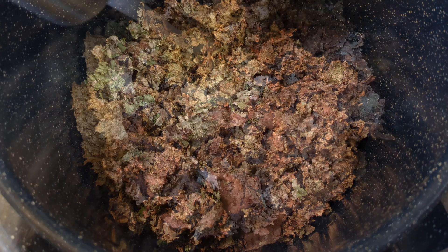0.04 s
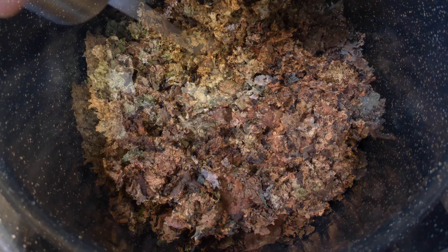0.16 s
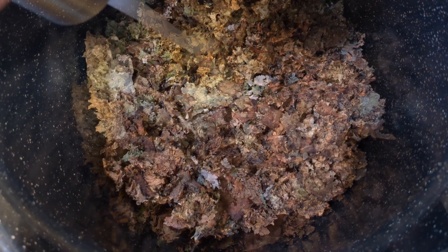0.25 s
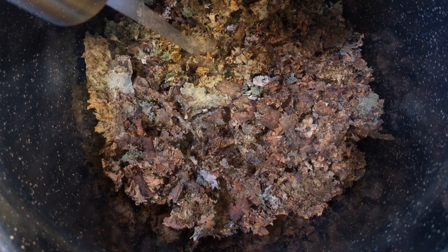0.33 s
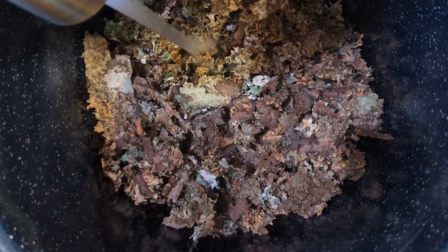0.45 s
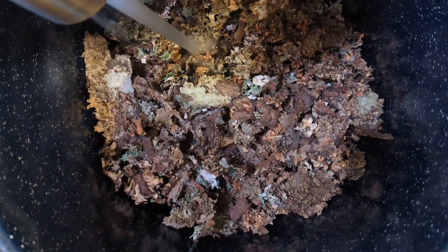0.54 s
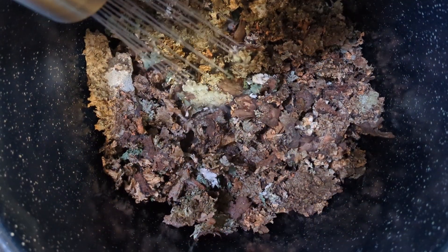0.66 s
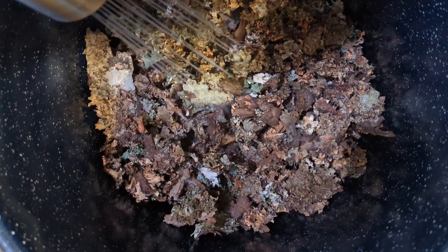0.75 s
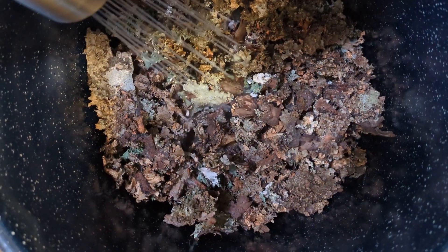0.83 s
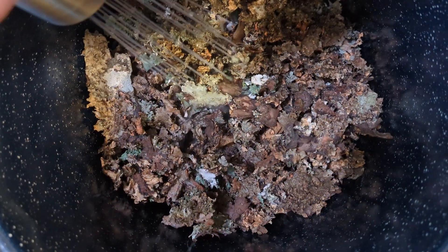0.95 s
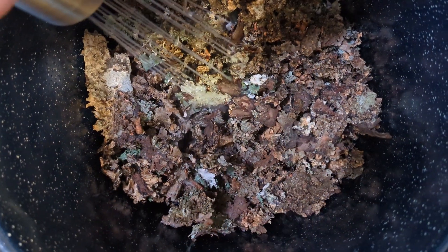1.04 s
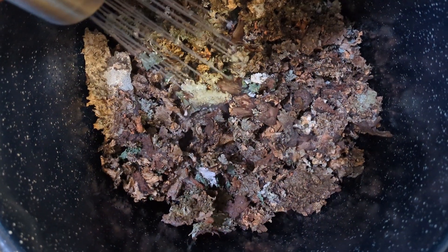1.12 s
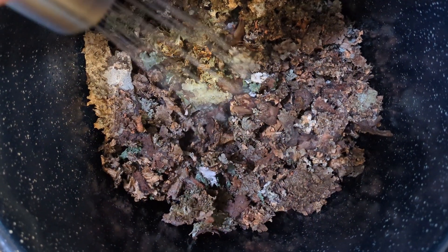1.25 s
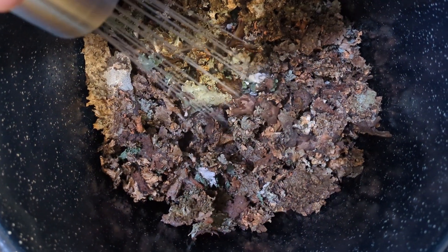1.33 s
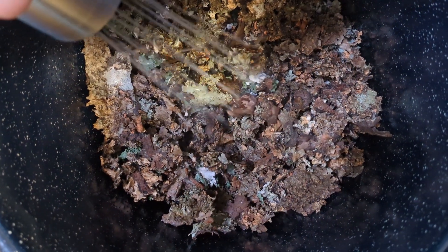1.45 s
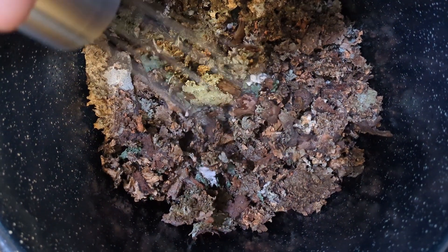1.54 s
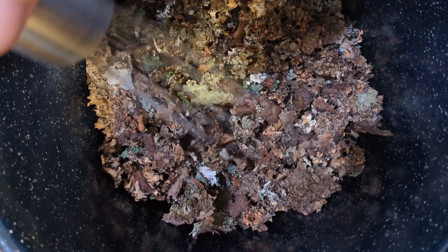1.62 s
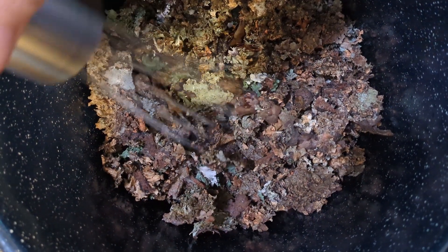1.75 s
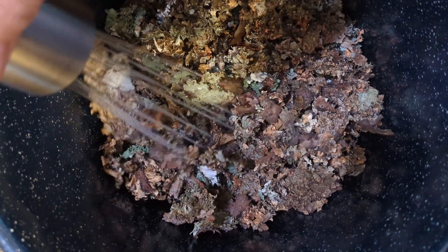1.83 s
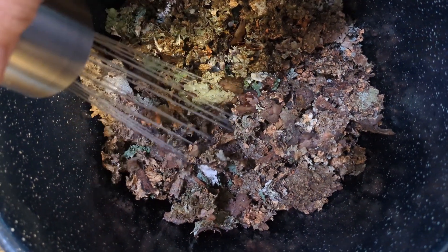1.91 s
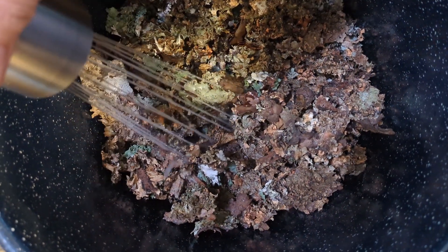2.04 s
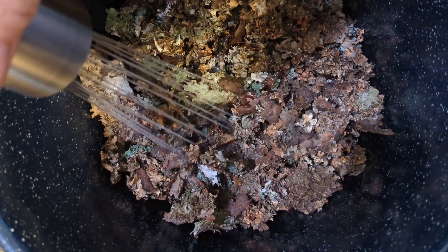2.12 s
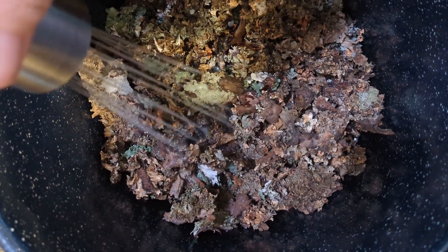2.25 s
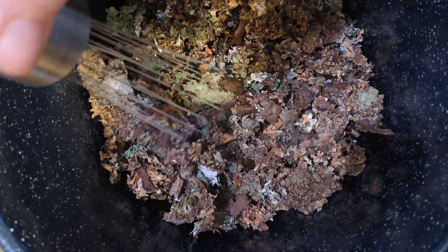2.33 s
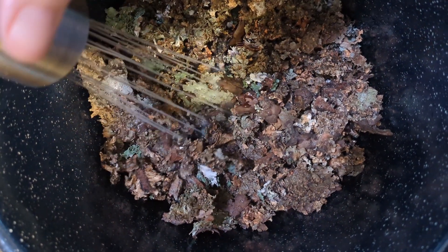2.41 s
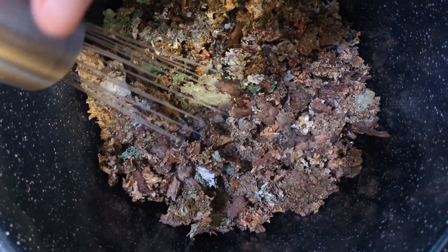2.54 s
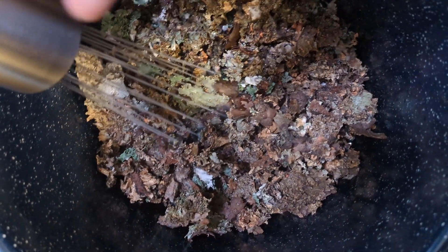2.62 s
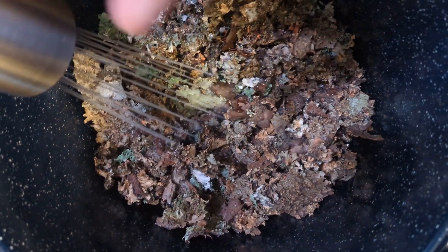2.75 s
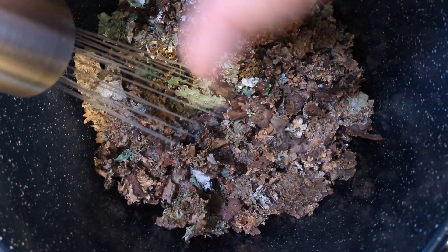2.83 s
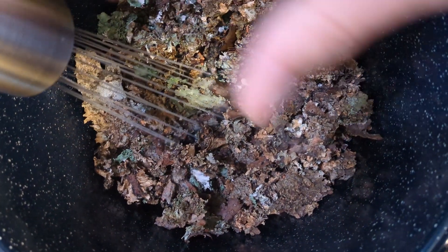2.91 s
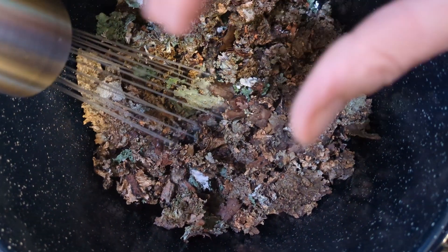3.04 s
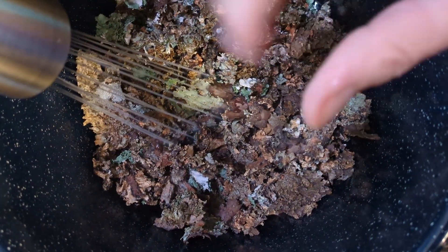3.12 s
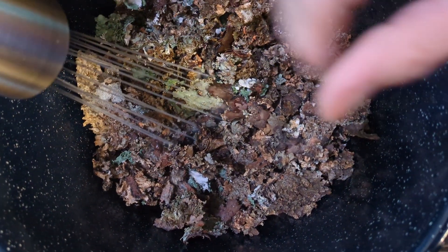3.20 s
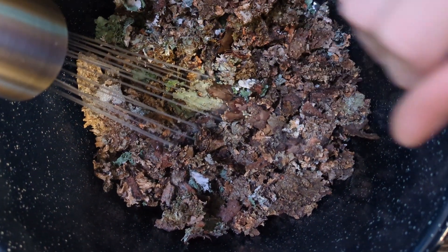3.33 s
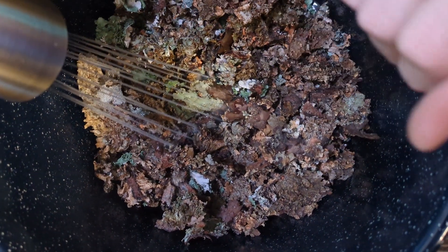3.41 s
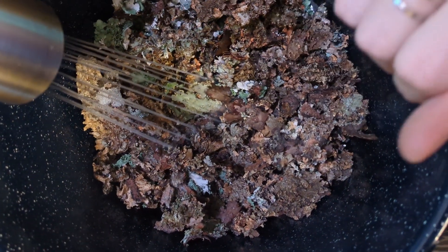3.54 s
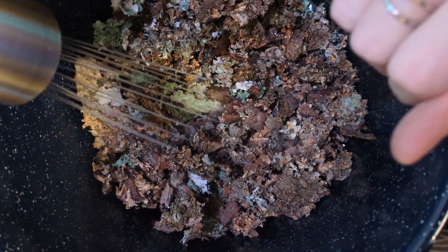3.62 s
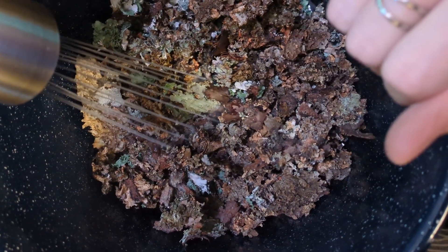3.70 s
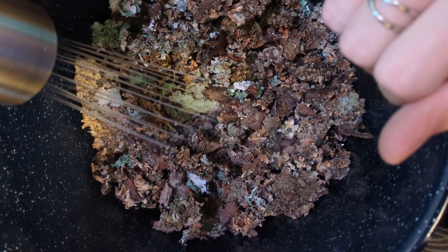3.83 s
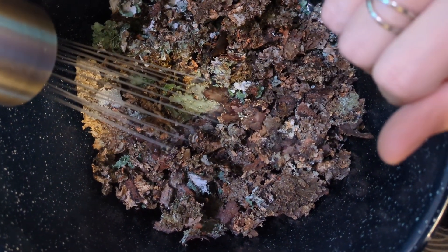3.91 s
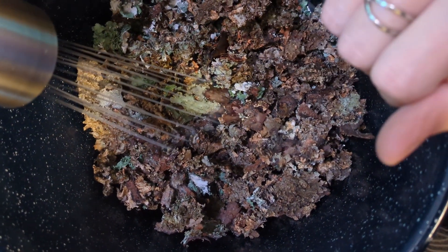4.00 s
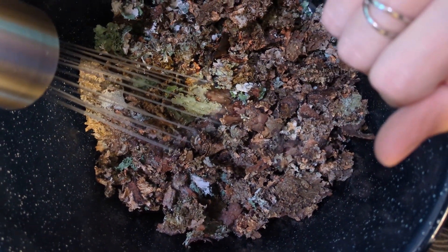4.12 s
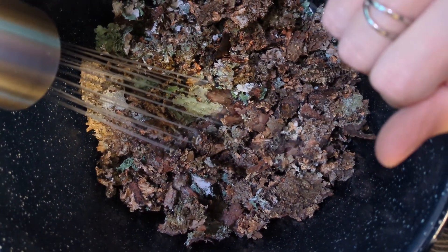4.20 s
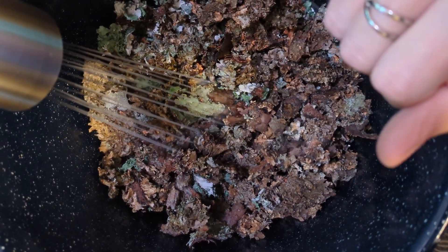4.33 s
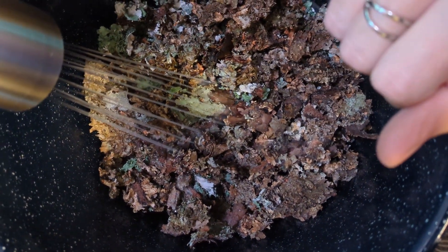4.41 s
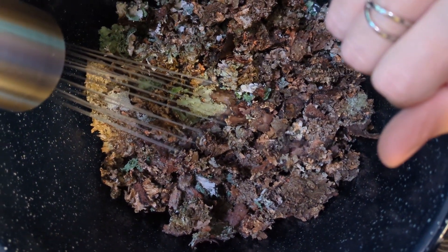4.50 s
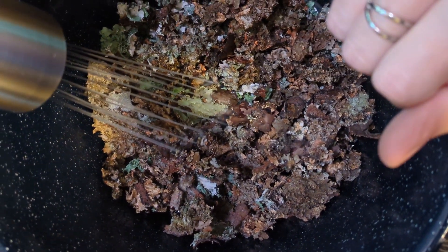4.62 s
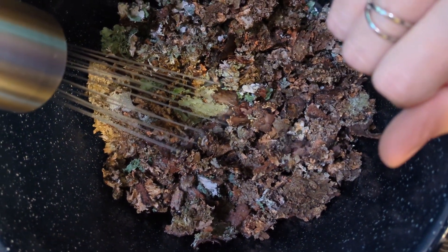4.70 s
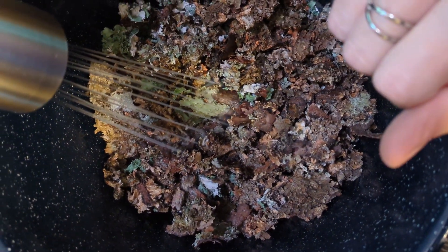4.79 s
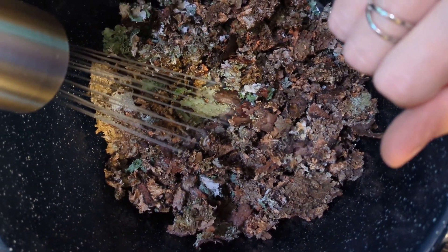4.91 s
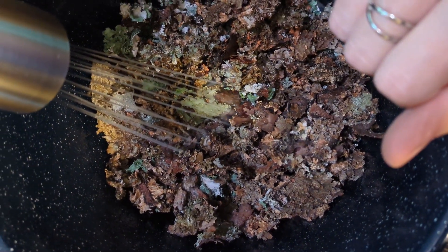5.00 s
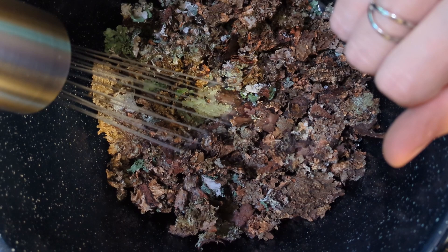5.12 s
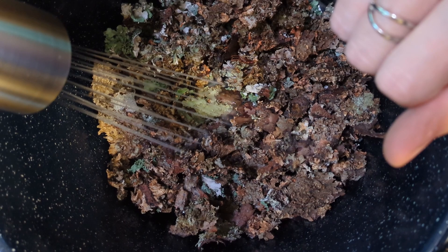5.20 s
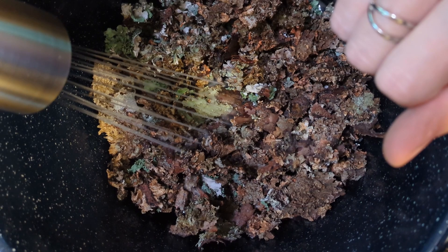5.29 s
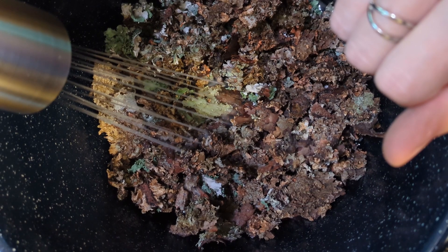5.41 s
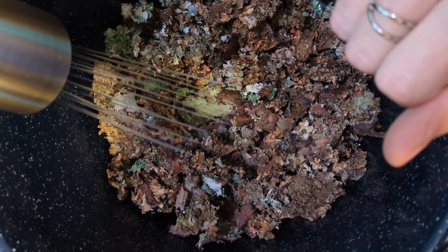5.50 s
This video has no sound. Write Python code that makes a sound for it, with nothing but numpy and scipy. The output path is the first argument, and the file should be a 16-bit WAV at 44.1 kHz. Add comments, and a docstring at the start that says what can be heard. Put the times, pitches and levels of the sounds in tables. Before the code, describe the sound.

A thin water stream fizzes briefly, then a valve clunks over and a bright, steady spray hisses onto flaky material in a pot.

```python
"""A spray of thin jets patters on lichen and bark in an enamel pot: random drops, echoed and coloured.
Before it, a soft single tap stream fizzes; a valve called the diverter snaps over with a sinking gulp.
The drops ring the pot (resonances), jets spit and sizzle (noise bursts), and water burbles (low noise).
The sprayer is moved about and bumped by hand (dull thuds). Behind it all an appliance motor hums
(sine tones) over a faint rumble (filtered noise)."""
import sys
import numpy as np
from scipy import signal
from scipy.fft import rfft, irfft, next_fast_len
from scipy.io import wavfile

SR = 44100
rng = np.random.default_rng(int(sys.argv[2]) if len(sys.argv) > 2 else 0)


def store_wav(level_fs):
    """Save 16-bit WAV to argv[1]."""
    pcm = np.round(np.clip(np.atleast_2d(level_fs), -1, 1) * 32767)
    wavfile.write(sys.argv[1], SR, pcm.T.astype(np.int16))


N = 244774
TIME = np.arange(N) / SR
FFT_SIZE = next_fast_len(N + SR // 10, True)  # spare room for filter tails
FREQS = np.maximum(np.arange(FFT_SIZE // 2 + 1) * SR / FFT_SIZE, 1)

# Tone colours, as strength at each frequency: pitch_hz, level_db (per Hz)
ROOM_COLOUR = [(20, -16), (45, -6), (100, 1.5), (140, -5), (180, -14.5), (280, -7.5), (500, -17.5),
               (1000, -29), (4000, -41), (9000, -48), (15000, -62)]
POOL_COLOUR = [(150, -28), (220, -10), (295, 7.5), (325, -1), (370, 0.5), (450, -8), (650, -32),
               (1200, -50)]
STREAM_COLOUR = [(400, -18.5), (620, -26), (950, -13), (1400, -13.5), (2300, -7), (3400, -10.5),
                 (5400, -10), (6300, -5.5), (8300, -3.5), (10800, -2), (11500, -6.5), (13400, -7.5),
                 (13900, -13), (15800, -12)]
SPRAY_COLOUR = [(400, -27), (620, -23), (950, -10.5), (1400, -10), (2100, -9), (2800, -0.5), (3700, -2),
                (4300, -4.5), (5100, -4.5), (5900, -4), (7700, -1.5), (11200, -1.5), (12300, -3.5),
                (13500, -4), (14050, -9), (15800, -9.5)]
# Steady tones of the motor hum: pitch_hz, rms_db
HUM = [(58.8, -41.5), (120, -54.5), (206, -75), (237, -66.5), (299.5, -68)]
# The hand bumps the sprayer: middle_s, level_db, spread_s, pitch_hz
BUMPS = [(2.862, -47, 0.014, 160), (2.89, -46.5, 0.029, 120)]
# The diverter flips with a gulp: start_s, level_db, start_hz, end_hz, rise_s, t60_s (time to fall 60 dB)
GULP = [(0.628, -35.5, 325, 265, 0.016, 0.47), (0.626, -37.5, 880, 1000, 0.0023, 0.17)]
# The diverter snaps over: middle_s, level_db, pitch_hz
SNAPS = [(0.63, -41, 1600), (0.641, -30.5, 3000)]
# Narrow resonances of the falling stream: pitch_hz, width_hz, boost_db
STREAM_PEAKS = [(3800, 210, 8), (4680, 140, 8), (6430, 300, 4), (8720, 180, 4.5), (9200, 350, 3.5),
                (10400, 250, -1.5), (10700, 200, 8), (12650, 360, 4), (13500, 150, 3)]
# How much later each spot's drops reach the right microphone than the left: lag_samples
JET_LAGS = [11, 4, 10, 7, 11, 3, 13, 10]
# A jet catches an edge and spits: middle_s, level_db, pitch_hz
SPITS = [(1.083, -29.5, 9500), (1.318, -31.5, 9000), (1.345, -33, 8500), (1.677, -31, 6200),
         (1.77, -31, 10500), (1.832, -31, 11200), (1.862, -33, 11500), (1.963, -33, 9900), (2.4, -37, 5700)]
# A jet dwells in a wet hollow and sizzles: middle_s, level_db, spread_s, pitch_hz
SIZZLES = [(1.41, -41, .035, 4000), (2.6, -40, 0.12, 8350), (2.876, -41, 0.12, 5080),
           (3.03, -35, 0.068, 7850), (3.84, -35, .08, 11700), (3.95, -43, 0.52, 3640)]
# Ringing tones of the pot wall: pitch_hz, width_hz, level_db, left_minus_right_db
POT_MODES = [(1006, 49, -21, 9), (1227, 47, -16.5, -10), (1449, 18, -20.5, 22), (1703, 47, -11, 12.5),
             (1790, 78, -11, 20.5), (1848, 32, -8, 15), (2097, 61, -10, 3), (2350, 13, -13.5, -6)]
# A jet grazes the pot wall: middle_s, boost_db
GRAZES = [(1.63, 5), (1.82, 5.5), (4.67, 4), (5.43, 6.5)]
# Standing water that the jets meet; only the swing around the mean counts: time_s, level_db
SOAK = [(0.76, -38.5), (1.24, -40), (1.25, -41.5), (1.37, -37), (1.38, -33.5), (1.51, -38), (1.9, -40),
        (1.91, -36.5), (1.99, -41), (2.36, -41), (2.4, -37.5), (3.72, -36), (5.4, -36.5)]
# Where the sprayer points: time_s, left_minus_right_db
AIM = [(0.65, 2.5), (1.01, 3.5), (2.38, 1), (3.97, 3.0), (5.28, 3), (5.5, 4.5)]
# How the microphone pair hears each pitch: pitch_hz, left_minus_right_db
BALANCE = [(400, -9.5), (750, -3.5), (1000, -0.3), (1250, -0.8), (1800, 4), (2700, -0.5), (4400, -2.5),
           (8000, -1.1), (14000, 3)]

STREAM_START_S = 0.1147  # the stream is heard abruptly, already running
SPRAY_ON_S, SPRAY_RISE_S = 0.626, 0.0076
ROOM_DB, STREAM_DB = -54.5, -35.2
CUTOFF_HZ = 15780
# Base level of each layer, and the share of the soak's swing that it follows
HISS_DB = -30.5
SPLASH_DB, SPLASH_FOLLOWS = -41.5, 1.4
PATTER_DB, PATTER_FOLLOWS = -45.5, 0.56
WALL_DB, WALL_FOLLOWS = -46, 1.2
POOL_DB, POOL_FOLLOWS = -56.5, 0.55
# As the pot fills, wall and pool get louder: total rise from empty to filled
FILL_START_S, FILL_S, WALL_FILL_DB, POOL_FILL_DB = 1.2, 1.8, 4, 3
# The jets form just after the switch and overshoot while the pent-up pressure escapes
JETS_DELAY_S, JETS_RISE_S = 0.026, 0.027
SURGE_DB, SURGE_HOLD_S, SURGE_DECAY_S = 3, 0.096, 0.028
DRY_DB, WETTING_S = 0.5, 1.1  # dry flakes hiss louder until they are wetted
# While the sprayer is turned, the jets glance off the heap and hiss less
TURN_S, TURN_SPREAD_S, TURN_DB = 1.86, 0.28, -0.7
# Spread of each short event in time; filter width as a share of its pitch
SPIT_S, SPIT_WIDTH = 0.012, 0.45
SNAP_S, SNAP_WIDTH = 0.002, 0.91
SIZZLE_WIDTH, GRAZE_S = 0.11, 0.073


def from_db(db):
    """Turn decibels into a multiplier."""
    return 10 ** (np.asarray(db) / 20)


def rms_one(x):
    """Scale so that the average of all channels has an rms of 1."""
    return x / np.sqrt(np.mean(np.atleast_2d(x).mean(axis=0) ** 2) + 1e-20)


def in_time(rows):
    """Draw a curve over time for each table column after the first."""
    s, *columns = np.transpose(rows)
    return [np.interp(TIME, s, column) for column in columns]


def per_hz(points):
    """Read a two-column pitch table at every frequency."""
    hz, db = np.transpose(points)
    return np.interp(np.log(FREQS), np.log(hz), db)


def shaped(x, gain):
    """Multiply each frequency of a sound by its own gain."""
    return irfft(rfft(x, FFT_SIZE) * gain, FFT_SIZE)[..., :N]


def panned(db):
    """Left and right gains for a left-minus-right difference in dB."""
    return from_db(np.array([[0.5], [-0.5]]) * db)


def ramp(at_s, rise_s):
    """A straight ramp from 0 to 1."""
    return np.clip((TIME - at_s) / rise_s, 0, 1)


def bell(s, spread_s):
    """A smooth rise and fall around a moment, 1 on top."""
    return np.exp(-0.5 * ((TIME - s) / spread_s) ** 2)


def drift(rate_hz):
    """Slow random wandering with an rms of 1."""
    return rms_one(shaped(rng.standard_normal(N), 1 / (1 + (FREQS / rate_hz) ** 2)))


def resonance(x, hz, width_hz):
    """Ring at one pitch, with a gain of about 1 at the peak."""
    r = np.exp(-np.pi * width_hz / SR)
    top = np.array([1, 0, -1]) * (1 - r * r) / 2
    bottom = [1, -2 * r * np.cos(2 * np.pi * hz / SR), r * r]
    return signal.lfilter(top, bottom, x)


def swell(noise, s, db, spread_s, hz, width_hz):
    """Noise passed twice through one resonance, rising and falling around a moment."""
    colour = resonance(resonance(noise, hz, width_hz), hz, width_hz)
    return rms_one(colour) * from_db(db) * bell(s, spread_s)


def mid_and_side(mid, side, side_db):
    """Add a difference between left and right to a shared middle."""
    return mid + from_db(side_db) * side * [[1], [-1]]


def drops(per_s, spread_db):
    """Impacts at random moments, many small and a few large."""
    sizes = from_db(spread_db * np.minimum(rng.exponential(1, N), 5))
    hits = rng.random(N) < per_s / SR
    return hits * sizes * rng.choice([-1, 1], N)


def jets(per_s, spread_db, echo_db, echo_t60, diffuse_hz, count):
    """Each jet's drops reach the left microphone first, then rattle between the pot walls."""
    t = np.arange(SR // 40) / SR
    high_pass = signal.butter(2, diffuse_hz, "high", fs=SR)
    out = np.zeros((2, N))
    for lag in np.resize(JET_LAGS, count):
        echoes = rng.standard_normal((2, len(t))) * from_db(-60 * t / echo_t60)
        echoes *= from_db(echo_db) / np.sqrt(np.sum(echoes ** 2) / 2)
        # long waves stay alike on both sides; short ones scatter
        path = signal.lfilter(*high_pass, echoes)
        path[0, 0] += 1
        path[1, lag] += 1
        out += signal.oaconvolve(drops(per_s / count, spread_db)[None], path, axes=1)[:, :N]
    # even out the extra treble that the echoes bring
    scattered = from_db(2 * echo_db) / (1 + (diffuse_hz / FREQS) ** 4)
    return shaped(out, 1 / np.sqrt(1 + scattered))


def soak():
    """How far the standing water is above or below its mean during the spray, in dB."""
    db, = in_time(SOAK)
    return db - db[TIME > SPRAY_ON_S].mean()


def filling():
    """Water gathers in the pot: -0.5 when empty, 0.5 when filled."""
    return ramp(FILL_START_S, FILL_S) - 0.5


def kitchen(side_db=-10):
    """An appliance motor hums in steady sine tones over a faint noise rumble."""
    hum = np.zeros(N)
    for hz, db in HUM:
        # a sine's peak is the square root of 2 times its rms
        hum += np.sqrt(2) * from_db(db) * np.sin(2 * np.pi * (hz * TIME + rng.random()))
    mid, side = rng.standard_normal((2, N))
    rumble = rms_one(shaped(mid_and_side(mid, side, side_db), from_db(per_hz(ROOM_COLOUR))))
    return (hum + from_db(ROOM_DB) * rumble) * panned(0.6)


def bumps(width_hz=85, side_db=-3):
    """Dull thuds of handling: low noise bursts, different on each side."""
    mid, side = rng.standard_normal((2, N))
    noise = mid_and_side(mid, side, side_db)
    return sum(swell(noise, *row, width_hz) for row in BUMPS)


def pool(side_db=-14, stream_db=-12):
    """Pockets of air burble in the water beneath the heap, fainter under the soft stream."""
    level_db = POOL_DB + POOL_FOLLOWS * soak() + POOL_FILL_DB * filling()
    level_db = level_db + stream_db * (TIME < SPRAY_ON_S)
    mid, side = (drops(per_s=760, spread_db=2.0) for part in range(2))
    burble = shaped(mid_and_side(mid, side, side_db), from_db(per_hz(POOL_COLOUR)))
    return rms_one(burble) * from_db(level_db) * panned(-0.95) * (TIME > STREAM_START_S)


def gulp(glide_s=0.062, rough=0.81):
    """The first slug of spray rings hollow: a low tone sinks and a short higher one climbs."""
    out = np.zeros(N)
    for s, db, start_hz, end_hz, rise, t60 in GULP:
        age = np.maximum(TIME - s, 0)
        hz = end_hz + (start_hz - end_hz) * np.exp(-age / glide_s)
        envelope = ramp(s, rise) * from_db(db - 60 * age / t60)
        tone = np.sin(2 * np.pi * np.cumsum(hz) / SR)
        out += envelope * tone * (1 + rough * drift(93))
    return out


def diverter():
    """Two dry snaps as the valve changes seats: very short, broad noise bursts."""
    noise = rng.standard_normal((2, N))
    return sum(swell(noise, s, db, SNAP_S, hz, hz * SNAP_WIDTH) for s, db, hz in SNAPS)


def stream():
    """The air-filled stream fizzes evenly, as dense tiny drops, until the diverter closes it."""
    colour_db = per_hz(STREAM_COLOUR)
    for hz, width, db in STREAM_PEAKS:
        colour_db = colour_db + db / (1 + (2 * (FREQS - hz) / width) ** 2)
    fizz = jets(per_s=40000, spread_db=1.5, echo_db=7.0, echo_t60=0.0084, diffuse_hz=1090, count=16)
    fizz = rms_one(shaped(fizz, from_db(colour_db)))
    heard = ramp(STREAM_START_S, 0.0035) * (1 - ramp(SPRAY_ON_S, SPRAY_RISE_S))
    return fizz * from_db(STREAM_DB) * panned(1.3) * heard


def spits(pan_db=3.0):
    """Jets make brief, broad noise spits off edges and narrower sizzles in hollows."""
    burst = np.array([drops(per_s=11000, spread_db=3.0) for side in range(2)])
    edges = sum(swell(burst, s, db, SPIT_S, hz, hz * SPIT_WIDTH) for s, db, hz in SPITS)
    hollows = sum(swell(burst, s, db, spread, hz, hz * SIZZLE_WIDTH) for s, db, spread, hz in SIZZLES)
    return panned(pan_db) * (edges + hollows)


def bubbles(count=3000, cycles=45, rise=0.03, spread_db=3.0, pan_spread_db=5):
    """Tiny bubbles ring in the wet heap, each rising a little in pitch; overall rms 1."""
    when, pitch = rng.random((count, 2)).T[..., None]
    size, side = rng.standard_normal((count, 2)).T[..., None]
    t = np.arange(SR // 30) / SR
    hz = 3000 + pitch * 11000
    age = t * hz / cycles
    phase = 2 * np.pi * hz * t * (1 + rise * (1 - np.exp(-age)) / 2)
    ring = from_db(spread_db * np.clip(size, -2, 2)) * np.exp(-age) * np.sin(phase)
    # add every ring into left and right, starting at its own moment
    at = ((when * N).astype(int) + np.arange(len(t))).ravel()
    channels = []
    for sign in (1, -1):
        heard = ring * from_db(sign * pan_spread_db * side / 2)
        channels.append(np.bincount(at, heard.ravel(), N)[:N])
    return rms_one(np.array(channels))


def wander(x, depth_db=0.5, rate_hz=9.3):
    """Hollows in the heap fill and drain, so narrow pitch regions swell and fade."""
    centres = np.linspace(0, 16000, 17)
    out = 0
    for hz in centres:
        region = np.maximum(1 - abs(FREQS - hz) / centres[1], 0)  # overlapping triangles
        out = out + shaped(x, region) * from_db(depth_db * drift(rate_hz))
    return out


def hiss_level(forming_db=-7.0):
    """Hiss level in dB: jets form, surge, settle as the flakes get wet and dip in the turn."""
    formed = ramp(SPRAY_ON_S + JETS_DELAY_S, JETS_RISE_S)
    since_hold = np.maximum(TIME - SPRAY_ON_S - SURGE_HOLD_S, 0)
    surge_db = SURGE_DB * np.exp(-since_hold / SURGE_DECAY_S)
    dry_db = DRY_DB * (1 - ramp(SPRAY_ON_S, WETTING_S))
    turn_db = TURN_DB * bell(TURN_S, TURN_SPREAD_S)
    return HISS_DB + turn_db + dry_db + formed * surge_db + (1 - formed) * forming_db


def pot_wall(patter):
    """Drops keep the damped wall ringing at its own pitches, each placed left or right."""
    out = 0
    for k, (hz, width, db, pan) in enumerate(POT_MODES):
        ringing = rms_one(resonance(patter, hz, width))
        out = out + ringing * from_db(db) * panned(pan) * (-1) ** k  # every other one is flipped
    return out


def spray(splash_hz=2200, hiss_hz=4400, flutter_db=0.02, patchy_db=0.51, bubble_db=-13):
    """Jets break into drops: low patter, middle splash, high hiss, and a ringing pot wall."""
    wet_db, (pan_db,) = soak(), in_time(AIM)
    rain = jets(per_s=22000, spread_db=2.5, echo_db=4.0, echo_t60=0.0091, diffuse_hz=2130, count=24)
    rain = rms_one(rain) + from_db(bubble_db) * bubbles()
    rain = wander(shaped(rain, from_db(per_hz(SPRAY_COLOUR)) * panned(per_hz(BALANCE))))
    # split by pitch so that each layer follows its own level
    below_splash, below_hiss = (1 / (1 + (FREQS / hz) ** 10) for hz in (splash_hz, hiss_hz))
    layers = [
        (below_splash, PATTER_DB + PATTER_FOLLOWS * wet_db),
        (below_hiss - below_splash, SPLASH_DB + SPLASH_FOLLOWS * wet_db),
        (1 - below_hiss, hiss_level()),
    ]
    water = sum(rms_one(shaped(rain, band)) * from_db(db + patchy_db * drift(24)) for band, db in layers)
    graze_db = sum(db * bell(s, GRAZE_S) for s, db in GRAZES)
    wall_db = WALL_DB + WALL_FOLLOWS * wet_db + WALL_FILL_DB * filling() + graze_db
    wall = pot_wall(drops(per_s=4000, spread_db=3.0)) * from_db(wall_db)
    flutter = from_db(flutter_db * drift(70))
    return (water * panned(pan_db) + wall) * flutter * ramp(SPRAY_ON_S, SPRAY_RISE_S)


def scene():
    """Kitchen, pot and water together."""
    background = kitchen() + bumps() + pool()
    switching = gulp() + diverter()
    return background + switching + stream() + spits() + spray()


def record(dry):
    """A steep low-pass filter removes the very top of the treble."""
    low_pass = signal.ellip(12, 0.1, 80, CUTOFF_HZ, fs=SR, output="sos")
    return signal.sosfilt(low_pass, dry)


dry = scene()
out = record(dry)
store_wav(out)
```